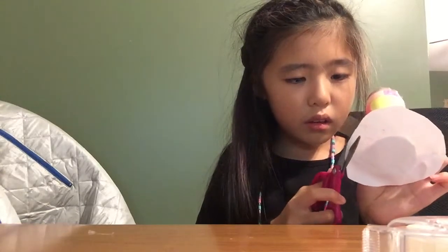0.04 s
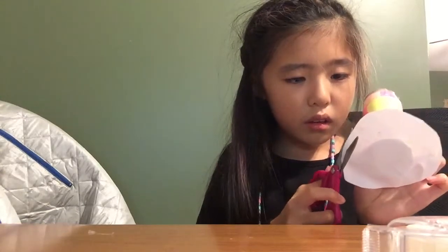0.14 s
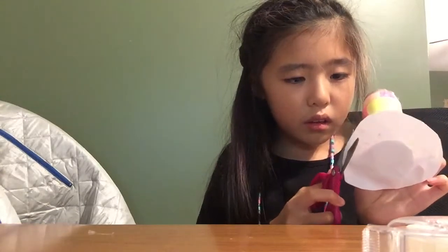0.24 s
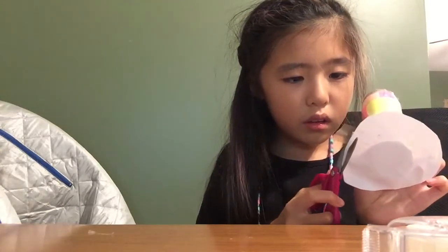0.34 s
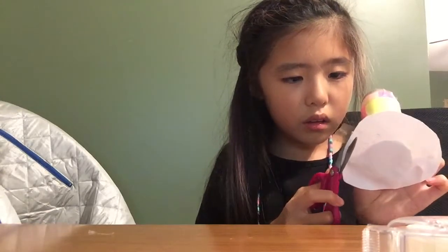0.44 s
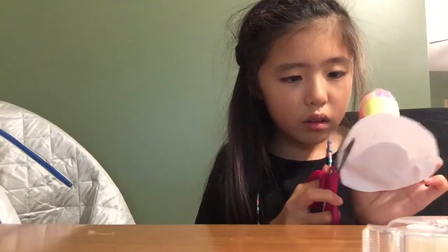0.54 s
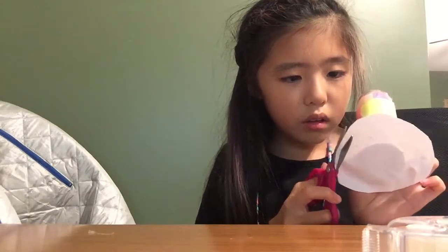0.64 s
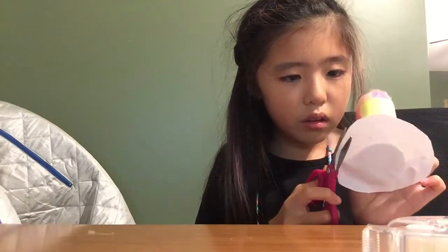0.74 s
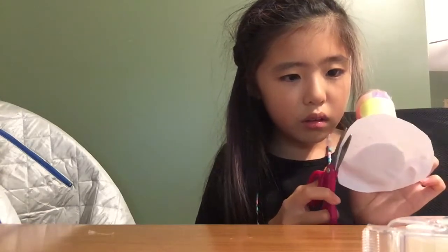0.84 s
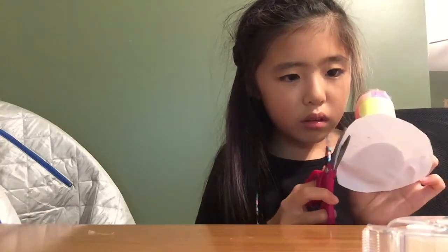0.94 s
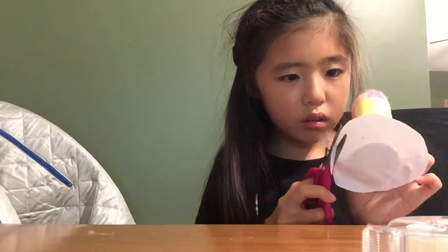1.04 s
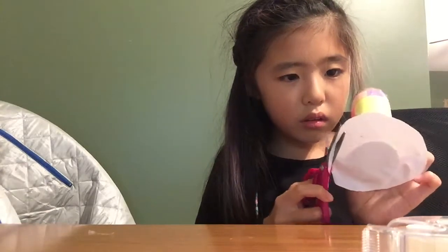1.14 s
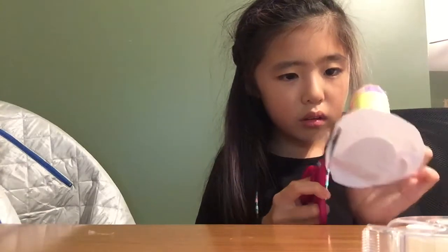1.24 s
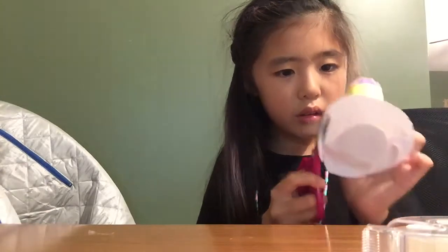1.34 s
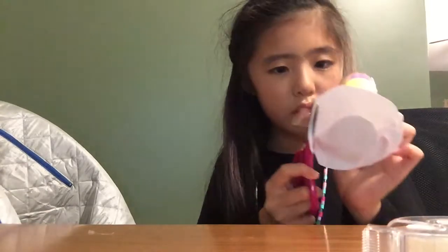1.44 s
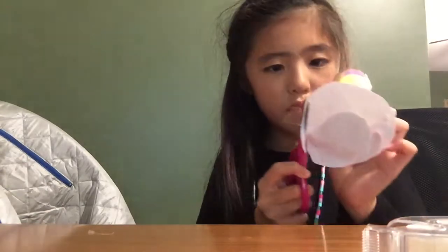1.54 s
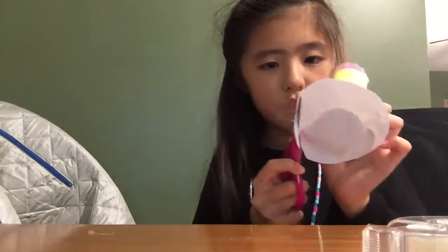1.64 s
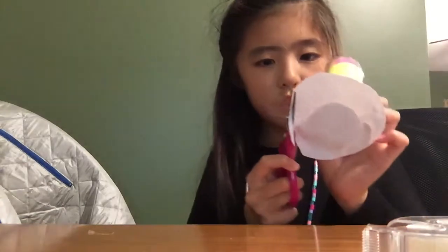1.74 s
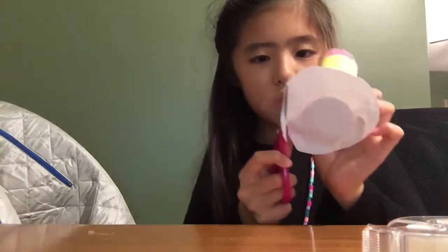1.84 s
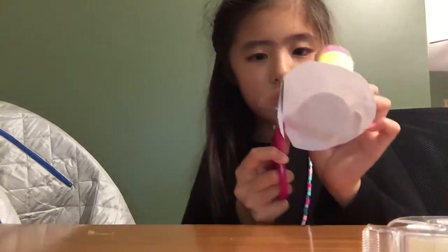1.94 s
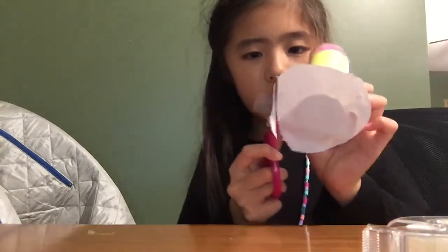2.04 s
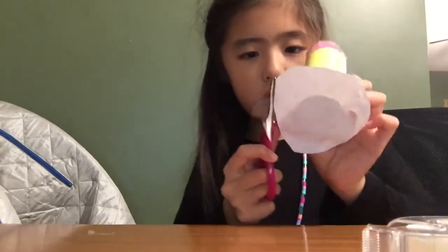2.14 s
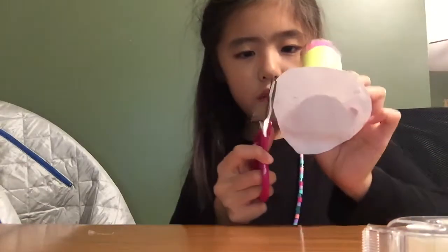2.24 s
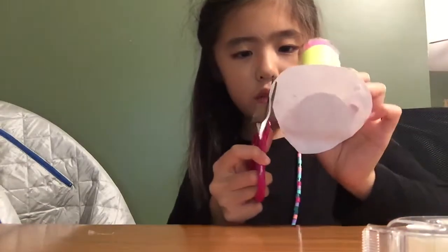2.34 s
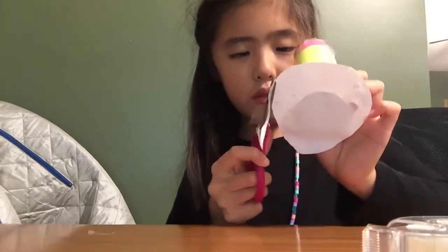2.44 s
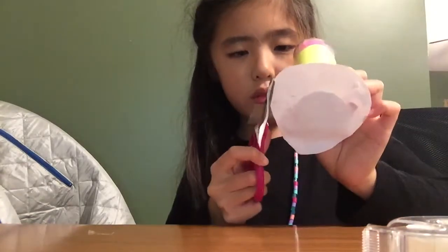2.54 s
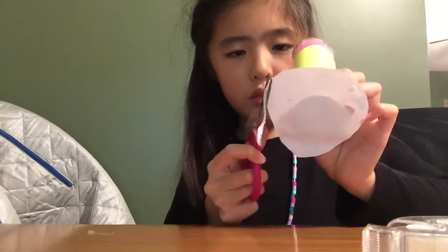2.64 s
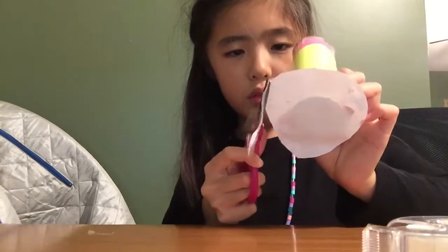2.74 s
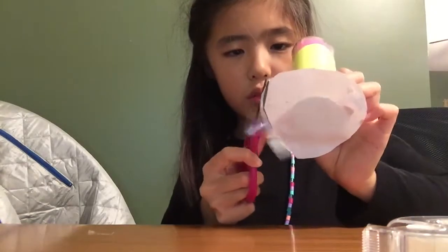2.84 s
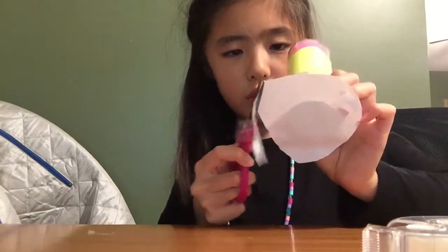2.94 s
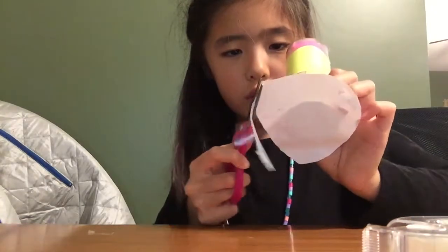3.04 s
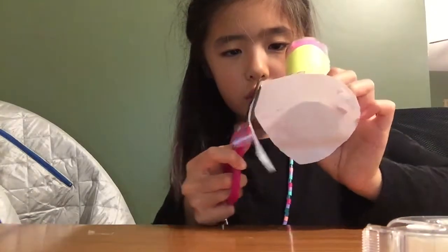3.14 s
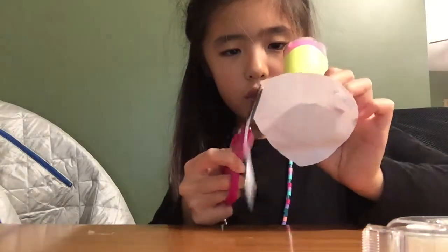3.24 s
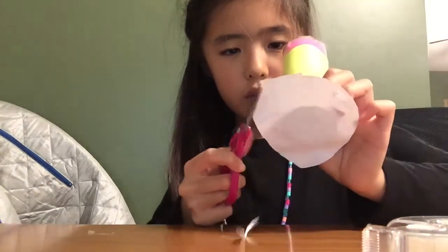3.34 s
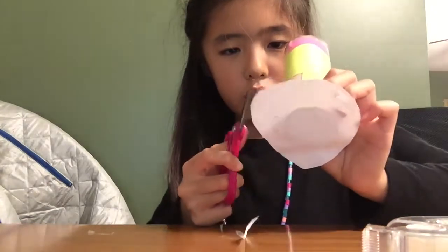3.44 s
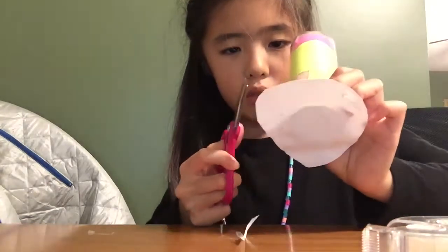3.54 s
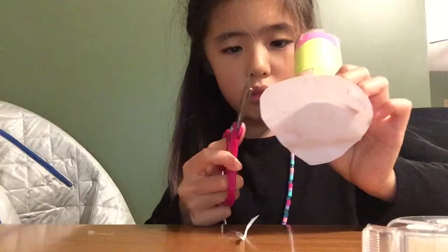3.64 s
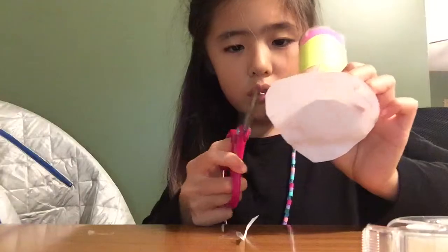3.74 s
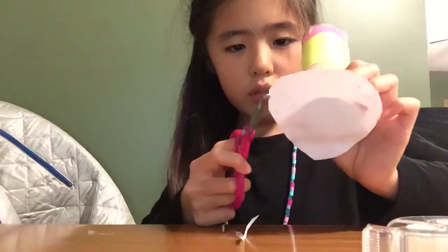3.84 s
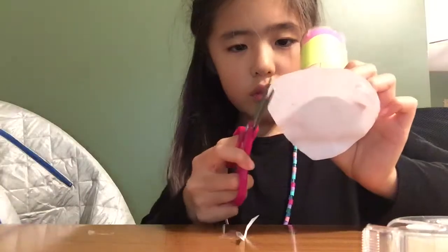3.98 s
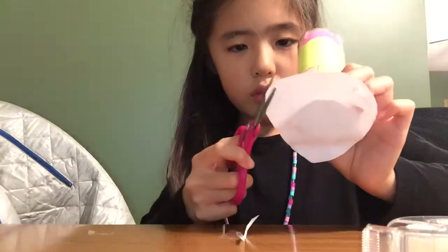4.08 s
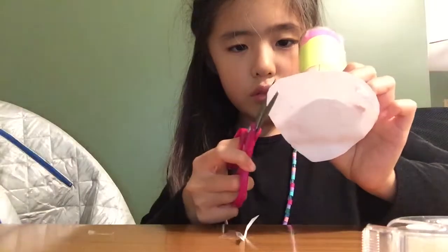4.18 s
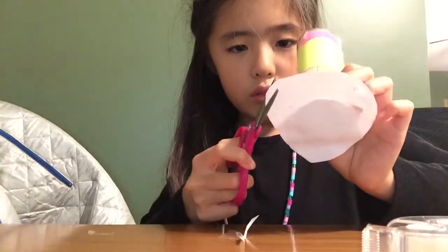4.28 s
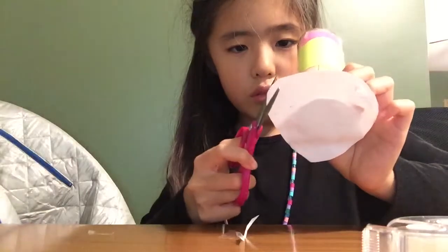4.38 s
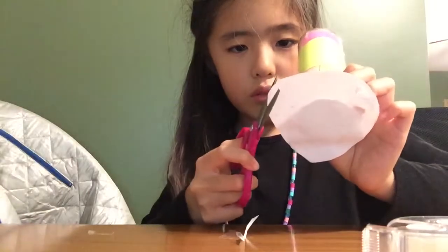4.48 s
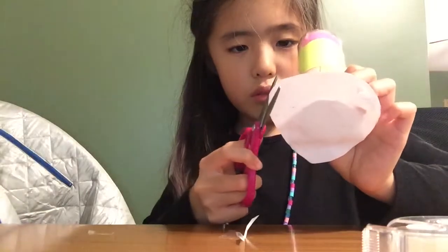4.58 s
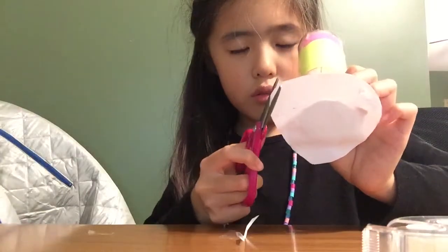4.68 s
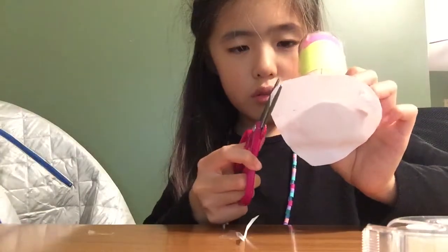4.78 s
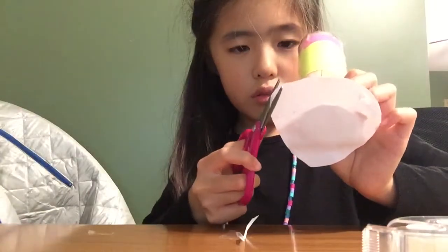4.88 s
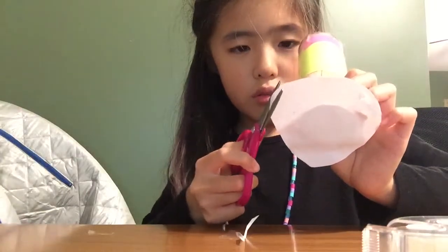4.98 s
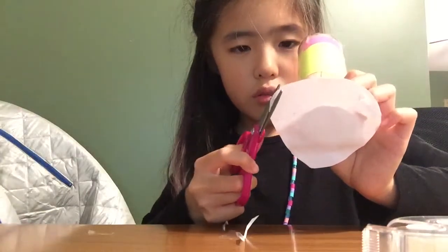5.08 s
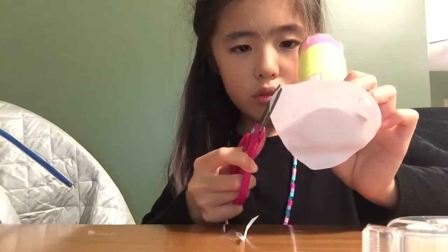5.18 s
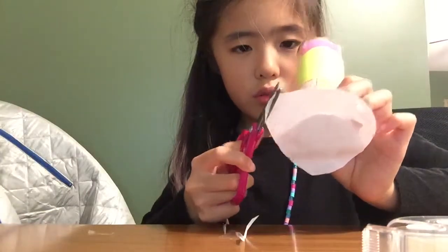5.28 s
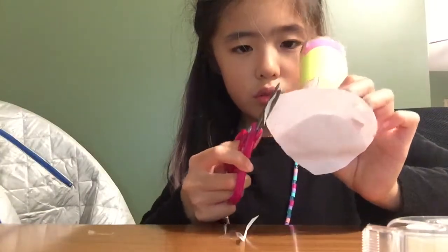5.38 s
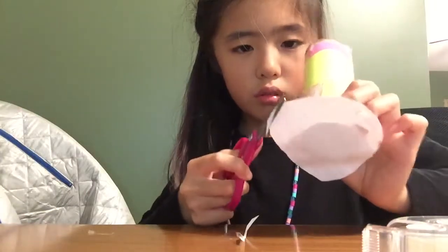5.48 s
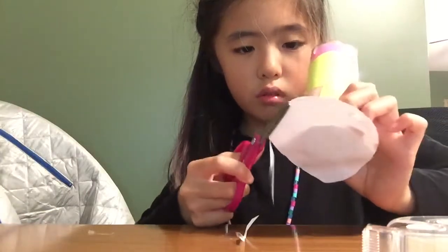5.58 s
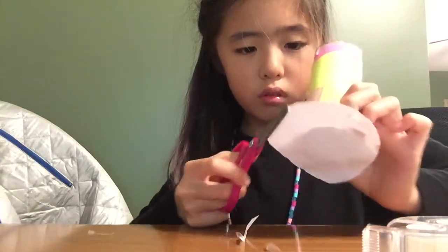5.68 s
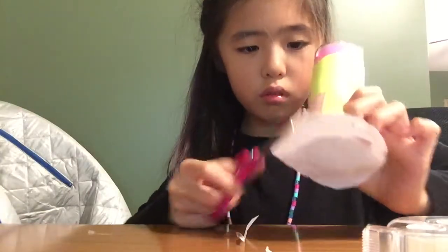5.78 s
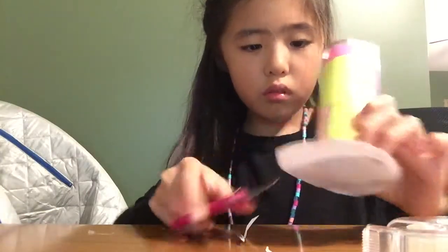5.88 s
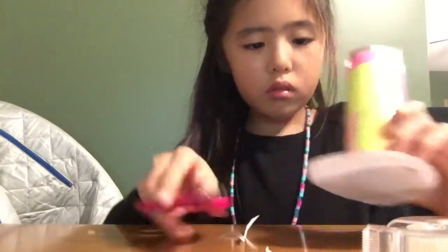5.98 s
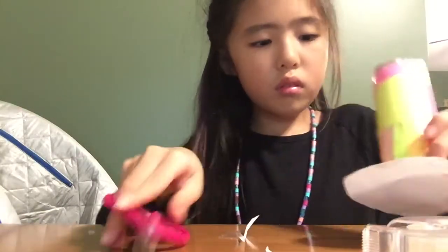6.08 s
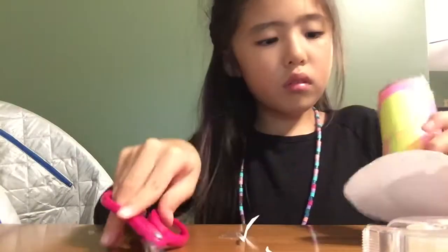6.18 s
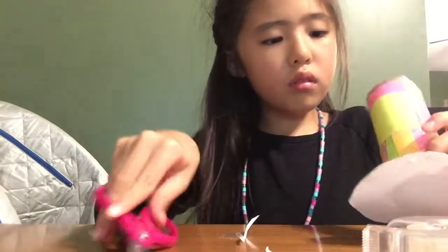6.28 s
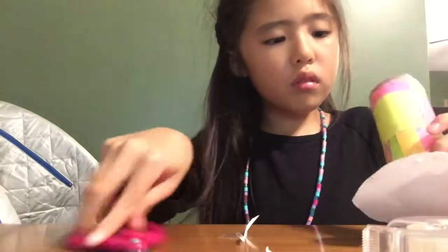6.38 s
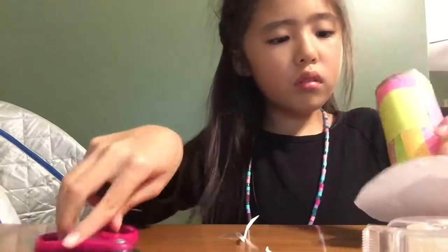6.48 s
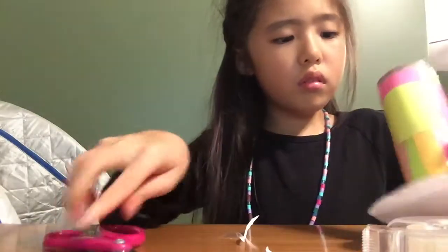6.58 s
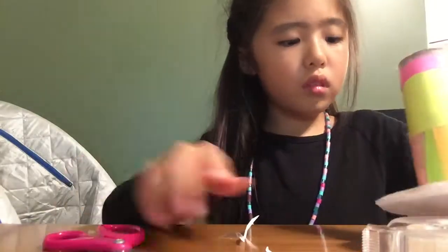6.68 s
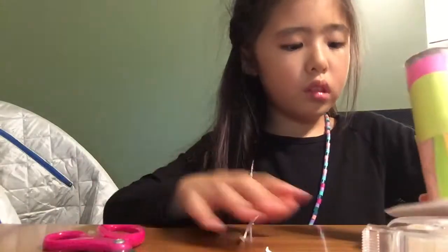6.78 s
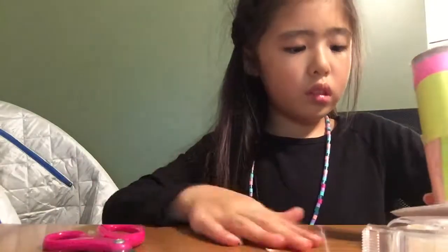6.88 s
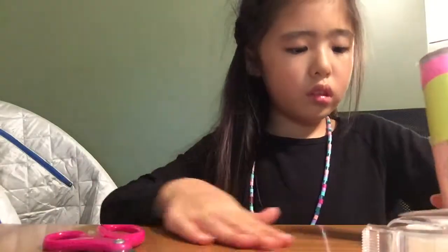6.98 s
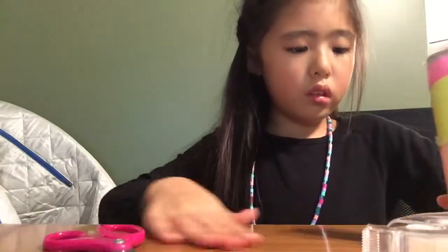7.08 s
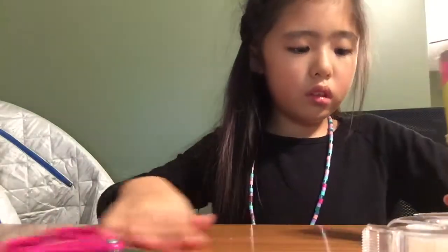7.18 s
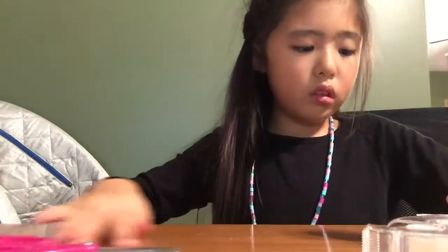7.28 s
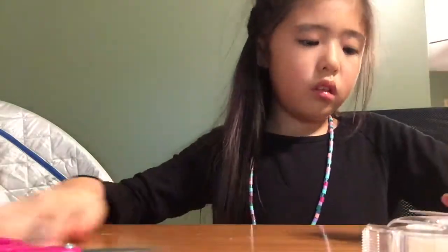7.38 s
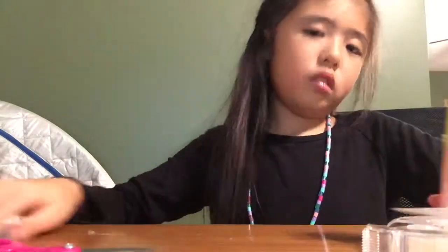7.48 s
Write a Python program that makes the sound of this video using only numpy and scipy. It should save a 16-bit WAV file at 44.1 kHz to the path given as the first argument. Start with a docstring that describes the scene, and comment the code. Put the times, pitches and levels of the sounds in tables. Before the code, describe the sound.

Small scissors rub open and crunch through a paper sheet, with soft rustles, before being set down with a sharp rattle and slid across wood.

```python
"""In a small, quiet room with a faint hush and rumble, scissors trim paper in short strokes at a wooden table.
The blades open with a smooth rub, judder when they close bare and crunch when they bite paper:
broken fibres and rubbing steel are grains and noise, coloured by the sheet. The sheet rustles as it is turned.
Then the scissors clatter down, clicks that ring the table and the steel, and are pushed aside,
with ticks, sliding handles and scraping tips."""
import sys
import numpy as np
from scipy import signal
from scipy.fft import rfft, irfft
from scipy.io import wavfile
from scipy.ndimage import uniform_filter1d

SR = 44100
rng = np.random.default_rng(int(sys.argv[2]) if len(sys.argv) > 2 else 0)


def store_pcm(level_fs):
    """Save levels as 16-bit WAV."""
    pcm = np.round(np.clip(level_fs, -1, 1) * 32767).astype(np.int16)
    wavfile.write(sys.argv[1], SR, np.atleast_2d(pcm).T)


N = 331632
HZ = np.fft.rfftfreq(4096, 1 / SR)  # frequency grid of all colouring

# Levels of events are drive levels, ahead of their colouring and the room.
# steady hush of the room: pitch_hz, level_db
HUSH_SPECTRUM = [(12, -41.5), (20, -11.5), (81, 0), (193, -7), (328, -9.5), (446, -19.5), (590, -12.5),
                 (759, -14), (2460, -16), (3440, -18), (4940, -19.5), (6910, -19), (9140, -24),
                 (10500, -27), (16000, -29.5)]
HUSH_DB = -67.5
# low rumble under the hush: pitch_hz, level_db
RUMBLE_SPECTRUM = [(25, -28.0), (95, -7.0), (200, 1), (350, -1.5), (600, -12.5), (2000, -51.5)]
# reverberation of the room: pitch_hz, t60_s
ROOM_DECAY = [(150, 0.47), (500, 0.22), (1500, 0.22), (5000, 0.26), (10000, 0.24), (16000, 0.33)]
# reflections from near walls and ceiling: delay_s, level_db
NEAR_ECHOES = [(.0046, -17), (.0088, -12.5), (0.014, -14.5), (0.0224, -16.5)]
# colour of those reflections: pitch_hz, level_db
ECHO_SPECTRUM = [(2000, -7.5), (14000, -10.5)]

# soft bumps and rubs of the arms on the table: start_s, length_s, centre_hz, level_db
ARM_BUMPS = [(3.06, 0.4, 298, -69), (3.455, 0.014, 312, -54), (3.455, 0.03, 84, -61),
             (4.475, 0.051, 70.4, -48.5), (4.5, 0.17, 45, -59.5), (4.5, .17, 118, -55.5),
             (5.01, 0.067, 169, -55), (5.62, 0.043, 129, -59), (5.892, 0.016, 121, -49.5),
             (5.94, 0.037, 82, -58)]
# light brushes and scuffs of paper and handles: start_s, length_s, centre_hz, level_db
BRUSHES = [(3.259, 0.008, 2340, -46.5), (4.462, 0.047, 5760, -52.5), (4.7, 0.058, 12100, -62.5),
           (5.062, 0.06, 5900, -62.5), (5.868, 0.0155, 3300, -44), (6.435, 0.016, 2500, -32.5)]

# resonances of the table top with the scissors lying on it: pitch_hz, level_db, t60_s
TABLE_MODES = [(105, -4.5, 0.15), (160, -7, 0.17), (341, -14.5, .1), (379, 5, .09), (426, 1.5, 0.044),
               (586, -22, .08), (802, 5, 0.12), (916, -10, .18), (990, -7, 0.23), (1030, -8, .16),
               (1125, -3.5, .16), (1277, -4, .16), (1550, -9, 0.26), (1716, -3.5, 0.091)]
# resonances of the blades and handles: pitch_hz, level_db, t60_s
SCISSOR_MODES = [(1316, -5.5, .12), (1386, -1.5, 0.049), (1940, -2.5, 0.11), (2050, -2, 0.13),
                 (2236, 0.5, .13), (2290, 2.5, 0.085), (3190, 3, .06), (4400, 4, 0.024), (6330, -6, .015),
                 (8700, 2, 0.0076)]
# hand and handles slide over the table: start_s, hardest_push_s, end_s, level_db
SLIDES = [(6.558, 6.578, 6.615, -37), (6.618, 6.665, 6.75, -37), (7.188, 7.32, 7.44, -38.5),
          (7.405, 7.428, 7.7, -40)]
# colour of a slide: pitch_hz, level_db
SLIDE_SPECTRUM = [(40, -26.5), (200, -30), (400, 0), (560, -11), (800, -1.5), (1150, 1), (1600, -12),
                  (2400, -21), (3000, -23), (6000, -38), (16000, -49)]
# steel tips scrape the table as the scissors are tipped over or pushed:
# start_s, hardest_push_s, end_s, level_db
SCRAPES = [(6.258, 6.285, 6.385, -40), (6.365, 6.415, 6.43, -48.5), (6.418, 6.428, 6.442, -29),
           (7.305, 7.36, 7.43, -38.5)]
# colour of steel held in the hand: pitch_hz, level_db
HELD_STEEL_SPECTRUM = [(300, -15), (900, -13.5), (1330, 3.5), (1700, -13), (2100, -12),
                       (2600, -25), (3200, -15), (4500, -29), (12000, -48.5)]
# a push sets in quickly, grows by this much to its hardest moment and eases off again
PUSH_EDGE_S, PUSH_SWELL_DB = 0.012, 13

# the scissors knock and tick on the table: start_s, level_db, hardness_db, ring_hz
KNOCKS = [(6.1493, 9, -3, 1470), (6.2751, 7, -9.5, 1350), (6.289, -3, -12, 2030), (6.4439, 18, -31, 990),
          (6.4558, 14.5, -2, 2140), (6.4628, 6.5, 0, 1390), (6.4692, 16.5, -28, 1050),
          (6.4754, 8.5, -6, 786), (6.5604, 5, -17, 1420), (6.6221, -0.5, -6.5, 1040),
          (6.6392, 2.5, -33, 1440), (6.6785, -1.5, -7.5, 1040), (6.6867, 0.5, -30.5, 1140),
          (6.9833, -24, -22, 654), (7.3452, 2.5, 1.5, 1450), (7.3538, 5.5, -22, 1103),
          (7.3799, -16, 0, 5800), (7.3996, 5.5, 2.5, 6070), (7.4214, 6, -4, 3550), (7.4302, -6, 5.5, 8160),
          (7.4452, -1.5, 1, 6100), (7.502, -11, -20, 2114)]
# snaps of paper and clicks of blades and handles: start_s, level_db, hardness_db, ring_hz
SNAPS = [(.2246, 1, -25, 1720), (.6471, -12.5, 3.5, 1150), (1.3281, -17, -29, 747),
         (1.7625, -19.5, -38, 1340), (1.9932, -13, 3.5, 1630), (2.8069, -11, -16, 1680),
         (3.2613, -14, -39, 1430), (3.2751, -28, 14, 1200), (3.5277, -16, -37, 1050),
         (3.8922, -26.5, -13, 790), (3.971, -31, 0, 1900), (4.1814, -14, -21, 1740),
         (4.4898, -26.5, -11, 690), (4.5806, -20, -13, 1400), (4.8764, -13, -32, 1620),
         (5.0108, -18, -42, 920), (5.6192, -10.5, -4, 1320), (5.7247, -25, -9, 705),
         (5.7737, -11.5, -15, 890), (5.8699, -7, -16, 2600), (5.8966, -8.5, -17, 1010),
         (5.9072, -8, -36, 1030), (6.117, -22, 2, 1610)]
# colour of a click: pitch_hz, level_db
CLICK_SPECTRUM = [(30, -25.5), (120, -4.5), (250, -5.5), (400, -1.5), (900, 0), (1700, -1.5), (2800, -5),
                  (7000, -8.5), (12000, -17.5), (16000, -27.5)]
# a harder contact lifts the fizz by its hardness and the rasp by a share of it
SNAP_RASP_DB, SNAP_RASP_SHARE, KNOCK_RASP_DB, KNOCK_RASP_SHARE = 0, 0.35, 3, 0.64
# a snap that rings lower moves more of the sheet and has more body; on the table the body is always alike
SNAP_BODY_HZ, SNAP_BODY_DB_PER_OCTAVE, KNOCK_BODY_DB = 1240, -15.5, -1

# the sheet shifts in the hand, a hollow rustle that dies away: start_s, length_s, level_db
RUSTLES = [(1.733, 0.12, -54.5), (3.472, 0.052, -50.5), (3.989, 0.15, -58), (4.152, 0.079, -44),
           (4.313, 0.055, -49), (4.689, 0.11, -52), (4.989, 0.074, -51), (5.508, 0.078, -46),
           (5.855, 0.06, -34.5)]
RUSTLE_BODY_DB, RUSTLE_RASP_DB, RUSTLE_FIZZ_DB = 14.5, -1.5, -4
RUSTLE_SHEET_HZ, RUSTLE_SWELL_DB, RUSTLE_GRIT_DB, RUSTLE_EDGE_S = 1140, -10.5, 3.5, 0.021

# colour of a blade stroke: pitch_hz, level_db
BLADE_SPECTRUM = [(100, -35.5), (330, -16.5), (480, -24.5), (700, -11), (900, -8.5), (1130, -2.5),
                  (1700, -1), (2400, -5.5), (3000, -5), (4300, -10.5), (5200, -15.5), (6500, -14.5),
                  (8300, -23), (13000, -21), (16000, -32)]
# tilt added as a rub starts and taken away as it ends: pitch_hz, level_db
SLOWING_TILT = [(3500, 0.25), (10000, 0.6)]
SHEET_WIDTH_HZ = 180  # paper is well damped, so its resonance is broad
# the blades open, a smooth dull rub that swells: start_s, length_s, level_db, body_db, fizz_db
OPENINGS = [(0.134, .12, -45.5, -9, -9), (0.61, 0.11, -36, 3.5, -4), (1.013, 0.11, -41, 1.5, -9),
            (1.384, 0.1, -40.5, -5, -17), (2.235, 0.096, -54, 11, -7)]
OPEN_RASP_DB, OPEN_SHEET_HZ, OPEN_SWELL_DB, OPEN_GRIT_DB, OPEN_EDGE_S = 5, 1440, 4, 2, 0.037
# the blades close: start_s, length_s, level_db, paper between the blades (0-1), fizz_db,
# swell_db over the stroke, sheet_hz
CUTS = [(0.293, 0.088, -39.5, 0.49, -6.5, -7, 1620), (0.798, 0.12, -45, 0.49, -5, -7, 1710),
        (1.19, 0.094, -42, 0.27, 1, -4.5, 2400), (1.548, 0.1, -44.5, 0.07, 9.5, -17, 1900),
        (1.917, 0.097, -39.5, 0.22, 10.5, 0, 1600), (2.052, 0.12, -36, 0.96, 1, -4, 1800),
        (2.455, 0.09, -35.5, 0.48, 2, 17, 1520), (2.617, 0.11, -39, 0.98, 1, -5, 1780),
        (2.784, 0.093, -38.5, 0.88, 4.5, -5, 1800), (2.934, 0.1, -37.5, 0.95, 2.5, -3.5, 1710),
        (3.251, 0.11, -44.5, 1, 6.5, -15, 1820), (3.388, 0.085, -40.5, 0.77, 0.5, -3, 2290),
        (5.117, 0.1, -37, 0.81, 4, 6.5, 1250), (5.268, 0.11, -37.5, 0.68, 4.5, -1, 1540),
        (5.604, 0.12, -47, 0.23, 15.5, -11, 1620)]
# pairs run from bare blades to a full bite of paper
# bare steel is thin and raspy and judders; paper adds body and damps both
CUT_BODY_DB, CUT_RASP_DB, CUT_JUDDER_DB = (-22, 10), (9.5, -2), (7, 0.5)
# blades that bite deep into paper start and stop more softly
CUT_EDGE_S = (0.016, 0.03)
CUT_GRIT_DB, JUDDER_HZ, JUDDER_SCATTER = 2.5, 51.9, 0.11

EDGE_HZ = 16050  # band limit of the microphone path


def amp(db):
    """Decibels to gain."""
    return 10 ** (np.asarray(db) / 20)


def unit(x):
    """Scales to rms 1."""
    return x / np.sqrt(np.mean(x ** 2) + 1e-20)


def read(points, hz=HZ):
    """Reads a spectrum table on a log-frequency axis."""
    f, value = np.transpose(points)
    return np.interp(np.log(hz + 1), np.log(f), value)


def add(mix, s, sound):
    """Mixes a sound in at time s."""
    part = mix[max(round(s * SR), 0):][:len(sound)]
    part += sound[:len(part)]


def colour(x, db):
    """Passes x through the causal filter that has this gain on the HZ grid."""
    mirrored_db = np.r_[db, db[-2:0:-1]]
    log_gain = np.log(amp(np.maximum(mirrored_db, -120)))
    taps = np.fft.ifft(np.exp(np.conj(signal.hilbert(log_gain)))).real
    return signal.fftconvolve(x, taps[:len(HZ)])


def resonance(hz, width, height):
    """A resonant bump on a flat spectrum, in dB."""
    return 20 * np.log10(abs(1 + height / (1 + 2j * (HZ - hz) / width)))


def tone(body_db, rasp_db, fizz_db):
    """Shelves below and above the middle register, in dB."""
    return read([(620, body_db), (1050, 0), (2100, 0), (3100, rasp_db), (5000, rasp_db), (10000, fizz_db)])


def wander(n, per_s):
    """Smooth chance of spread 1 that changes per_s times a second."""
    at = np.arange(n) * per_s / SR
    return np.interp(at, np.arange(len(HZ)), rng.standard_normal(len(HZ))) * np.sqrt(3 / 2)


def grains(n, per_s, spread_db):
    """Random tiny clicks of very unequal size, rms 1."""
    chance, size, sign = rng.random((n, 3)).T
    heights = amp(-spread_db * np.log(np.maximum(size, 0.02)))
    return unit((chance < per_s / SR) * heights * np.sign(sign - 0.5))


def ring(x, modes):
    """The modes of an object, decaying sines, answer whatever drives it."""
    t = np.arange(SR // 3) / SR
    answer = np.zeros(len(t))
    for k, (hz, db, t60) in enumerate(modes):
        # dividing by t60 lets each mode peak at its own level
        answer += amp(db - 60 * t / t60) * np.sin(2 * np.pi * hz * t) * (-1) ** k / t60
    return signal.fftconvolve(x, answer * 2 * np.log(1000) / SR)[:N]


def background(rumble_db=-74, drift_db=1.3):
    """Steady hush with a low rumble that drifts, both coloured noise."""
    hush = unit(colour(rng.standard_normal(N), read(HUSH_SPECTRUM))[:N])
    rumble = unit(colour(rng.standard_normal(N), read(RUMBLE_SPECTRUM))[:N])
    return amp(HUSH_DB) * hush + rumble * amp(rumble_db + drift_db * wander(N, per_s=15))


def room(x, echo_db, tail_db, scatter_s=0.00032):
    """Direct sound, a few near reflections scattered by furniture, and a short diffuse tail."""
    n = SR // 2
    hz, t, bands = signal.stft(rng.standard_normal(n), SR, nperseg=256)
    decay = amp(-60 * t / read(ROOM_DECAY, hz)[:, None])
    tail = signal.istft(bands * decay, SR, nperseg=256)[1][:n]
    t = np.arange(n) / SR
    tail *= np.clip(t / 0.017, 0, 1) ** 2  # the tail builds up gradually
    response = amp(tail_db) * tail / np.linalg.norm(tail)
    for delay, db in NEAR_ECHOES:
        patch = colour(rng.standard_normal(n) * np.exp(-t / scatter_s), read(ECHO_SPECTRUM))
        add(response, delay, amp(db + echo_db) * patch / np.linalg.norm(patch))
    return x + signal.fftconvolve(x, response)[:N]


def swishes(rows, octaves):
    """Soft bumps and rubs: short swells of noise around one frequency."""
    out = np.zeros(N)
    for s, length, hz, db in rows:
        n = int(length * SR)
        band = -20 * np.log10(1 + (np.log2((HZ + 1) / hz) / octaves) ** 2)
        band -= 10 * np.log10(np.mean(amp(band) ** 2))  # equal power at any width
        rub = rng.standard_normal(n) * signal.windows.tukey(n, 0.5)
        add(out, s, amp(db) * colour(rub, band))
    return out


def pressure(pushes):
    """Each push sets in, swells to its hardest moment and eases off."""
    t = np.arange(N) / SR
    total = np.zeros(N)
    for start, top, end, db in pushes:
        gate = np.clip(np.minimum(t - start, end - t) / PUSH_EDGE_S, 0, 1)
        swell_db = np.interp(t, [start, top, end], [db - PUSH_SWELL_DB, db, db - PUSH_SWELL_DB])
        total += gate * amp(swell_db)
    return total


def sliding(table=0.6, scissors=0.44, judder_db=3):
    """Plastic handles judder over the wood; their uneven catches ring the table and the scissors."""
    catches = grains(N, per_s=700, spread_db=0.5) * amp(judder_db * wander(N, per_s=110))
    rub = colour(catches, read(SLIDE_SPECTRUM))[:N]
    ringing = table * ring(rub, TABLE_MODES) + scissors * ring(rub, SCISSOR_MODES)
    return pressure(SLIDES) * unit(rub + ringing)


def scraping(judder_db=3):
    """Steel tips drag over the wood, their ringing broadened by the grip of the hand."""
    catches = grains(N, per_s=2500, spread_db=0.5) * amp(judder_db * wander(N, per_s=200))
    return pressure(SCRAPES) * unit(colour(catches, read(HELD_STEEL_SPECTRUM))[:N])


def clicks(rows, shelves, contact_s, chatter, chatter_s, ring_width, thud_s, mirror_db, mirror_s=0.000899):
    """Each contact is a hard tick with a brief chatter and a slower thud, into one damped resonance."""
    out = np.zeros(N)
    t = np.arange(2048) / SR
    hz = np.fft.rfftfreq(len(t), 1 / SR)
    bass = 1 / (1 + (hz / 520) ** 4)  # share of the thud; the tick takes the rest
    fade = np.clip((t[-1] - t) / 0.014, 0, 1)
    lead = 20  # samples kept free ahead of the contact
    for s, db, hard_db, ring_hz in rows:
        fast, slow = rng.standard_normal((2, len(t)))
        # the table top mirrors the sound over a path that varies from contact to contact
        delay = mirror_s * rng.uniform(0.8, 1.2)
        comb = (1 + amp(mirror_db) * np.exp(-2j * np.pi * hz * delay)) / np.hypot(1, amp(mirror_db))
        tick = rfft(fast * (np.exp(-t / contact_s) + chatter * np.exp(-t / chatter_s)))
        tick = tick / abs(tick) ** 0.5  # shallow dips only
        thud = rfft(slow * np.sqrt(t) * np.exp(-t / thud_s))
        both = (1 - bass) * comb * tick / np.std(tick) + bass * thud / np.std(thud)
        contact = np.roll(irfft(both), lead) * fade
        ringing = resonance(ring_hz, ring_width * ring_hz, height=2.5)
        shape = read(CLICK_SPECTRUM) + shelves(hard_db, ring_hz) + ringing
        add(out, s - lead / SR, amp(db) * colour(contact, shape))
    return out


def knock_tone(hard_db, ring_hz):
    """Colour of a knock: treble from its hardness, whatever its pitch."""
    return tone(KNOCK_BODY_DB, KNOCK_RASP_DB + KNOCK_RASP_SHARE * hard_db, hard_db)


def knocking():
    """The scissors strike the wood, and both the table and the steel ring on."""
    knocks = clicks(KNOCKS, knock_tone, contact_s=0.00078, chatter=0.28, chatter_s=0.003,
                    ring_width=0.2, thud_s=0.011, mirror_db=-7)
    return knocks + amp(1.0) * ring(knocks, TABLE_MODES) + amp(-2.5) * ring(knocks, SCISSOR_MODES)


def snap_tone(hard_db, ring_hz):
    """Colour of a snap: body from its pitch, treble from its hardness."""
    body_db = SNAP_BODY_DB_PER_OCTAVE * np.log2(ring_hz / SNAP_BODY_HZ)
    return tone(body_db, SNAP_RASP_DB + SNAP_RASP_SHARE * hard_db, hard_db)


def snapping():
    """Paper snaps and blades and handles click, each a short contact with its own ring."""
    return clicks(SNAPS, snap_tone, contact_s=0.00069, chatter=1.0, chatter_s=0.0042,
                  ring_width=0.18, thud_s=0.0032, mirror_db=-9.5)


def stroke(length, db, shelves, sheet_hz, swell_db, grit_db, edge_s, judder_db,
           fibres_per_s=1800, steel=0.63, lumpy_db=3.0):
    """Fibres break and surfaces rub; the rub catches and slips, and the sheet radiates it."""
    t = np.arange(0, length, 1 / SR)
    along = np.linspace(0, 1, len(t))
    gate = np.sin(np.pi / 2 * np.clip(np.minimum(t, t[-1] - t) / edge_s, 0, 1)) ** 2
    fibres = grains(len(t), fibres_per_s, spread_db=1.0)
    friction = fibres + steel * rng.standard_normal(len(t))
    # an uneven clock for the judder
    catches = np.cumsum(1 + JUDDER_SCATTER * wander(len(t), per_s=JUDDER_HZ)) / SR - edge_s
    grit = grit_db * wander(len(t), per_s=234.5)
    judder = judder_db * np.cos(2 * np.pi * JUDDER_HZ * catches)
    slip = amp(grit + judder + swell_db * along)
    drive = amp(db) * gate * unit(friction * slip)
    sheet = read(BLADE_SPECTRUM) + shelves + resonance(sheet_hz, SHEET_WIDTH_HZ, height=1.03)
    # the rub travels along the sheet, so its many small resonances shift between start and end
    lumps = uniform_filter1d(rng.standard_normal((2, len(HZ))), size=20) * np.sqrt(20)
    first, last = lumpy_db * lumps
    # the rub slows toward its end, and its fizz fades a little
    slowing = read(SLOWING_TILT)
    turn = np.pi / 2 * along
    start = colour(drive * np.cos(turn) ** 2, sheet + first + slowing)
    end = colour(drive * np.sin(turn) ** 2, sheet + last - slowing)
    return start + end


def rustling():
    """The sheet rubs on fingers and blades as it is turned."""
    out = np.zeros(N)
    shelves = tone(RUSTLE_BODY_DB, RUSTLE_RASP_DB, RUSTLE_FIZZ_DB)
    for s, length, db in RUSTLES:
        add(out, s, stroke(length, db, shelves, RUSTLE_SHEET_HZ, RUSTLE_SWELL_DB,
                           RUSTLE_GRIT_DB, RUSTLE_EDGE_S, judder_db=0))
    return out


def opening():
    """The blades part with a smooth rub, free of judder."""
    out = np.zeros(N)
    for s, length, db, body_db, fizz_db in OPENINGS:
        shelves = tone(body_db, OPEN_RASP_DB, fizz_db)
        add(out, s, stroke(length, db, shelves, OPEN_SHEET_HZ, OPEN_SWELL_DB,
                           OPEN_GRIT_DB, OPEN_EDGE_S, judder_db=0))
    return out


def bite(pair, paper):
    """Blends a setting from bare blades (paper 0) to a full bite (paper 1)."""
    bare, full = pair
    return bare + paper * (full - bare)


def cutting():
    """The blades close; the paper between them sets the colour and the judder of a cut."""
    out = np.zeros(N)
    for s, length, db, paper, fizz_db, swell_db, sheet_hz in CUTS:
        shelves = tone(bite(CUT_BODY_DB, paper), bite(CUT_RASP_DB, paper), fizz_db)
        add(out, s, stroke(length, db, shelves, sheet_hz, swell_db, CUT_GRIT_DB,
                           bite(CUT_EDGE_S, paper), bite(CUT_JUDDER_DB, paper)))
    return out


def scene():
    """Cutting in the hands, then the scissors on the table, in one room."""
    soft = swishes(ARM_BUMPS, octaves=0.45) + swishes(BRUSHES, octaves=0.28)
    on_table = sliding() + scraping() + knocking()
    in_hand = soft + snapping() + rustling() + opening() + cutting()
    table_in_room = room(on_table, echo_db=-4, tail_db=-13.5)
    hands_in_room = room(in_hand, echo_db=-5, tail_db=-17)
    return (background() + table_in_room + hands_in_room)[None]


def record(dry):
    """The microphone path ends at a steep band limit."""
    low_pass = signal.firwin(511, EDGE_HZ, window=("kaiser", 9), fs=SR)
    return signal.oaconvolve(dry, low_pass[None], "same")


dry = scene()
out = record(dry)
store_pcm(out)
```